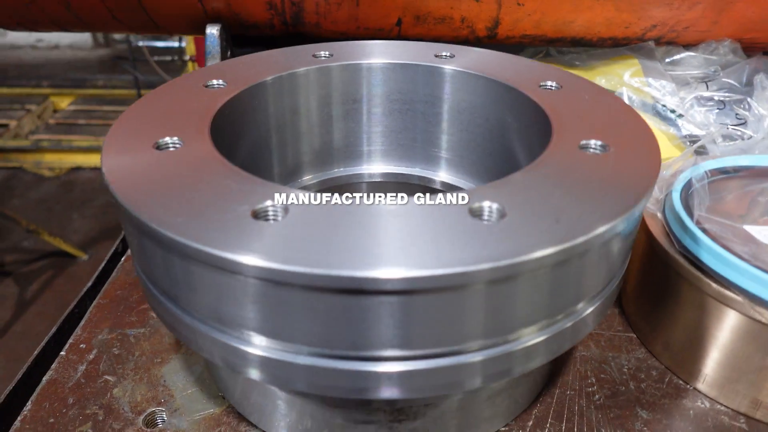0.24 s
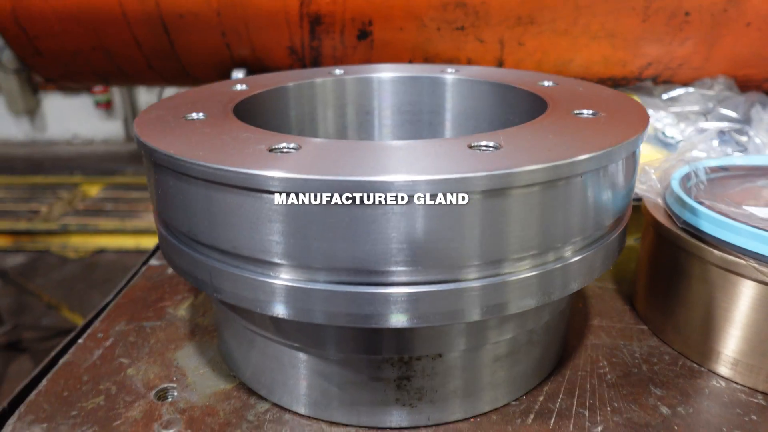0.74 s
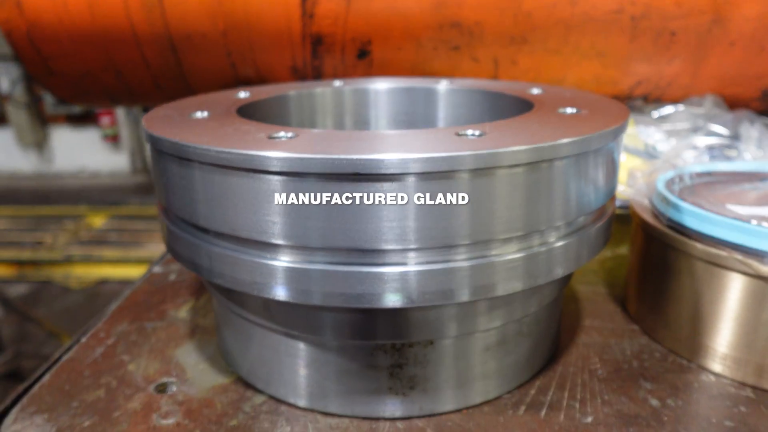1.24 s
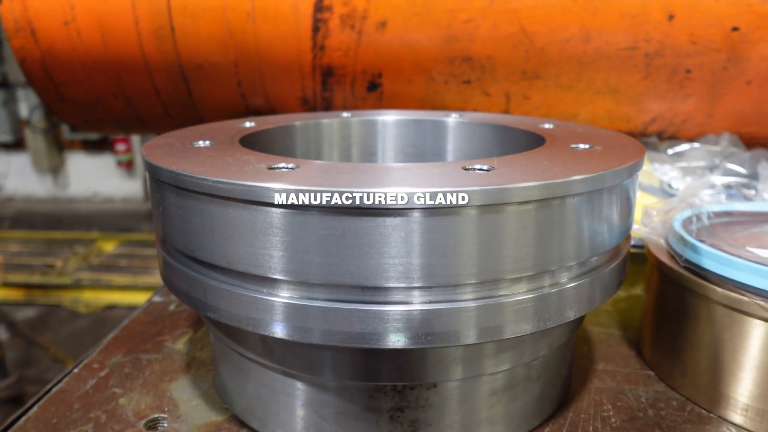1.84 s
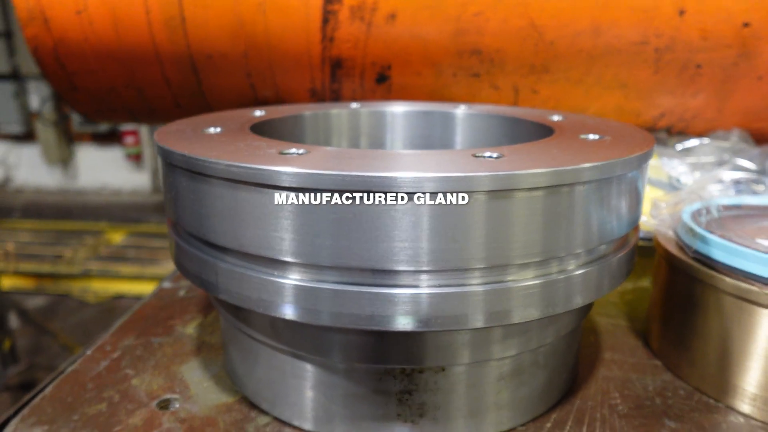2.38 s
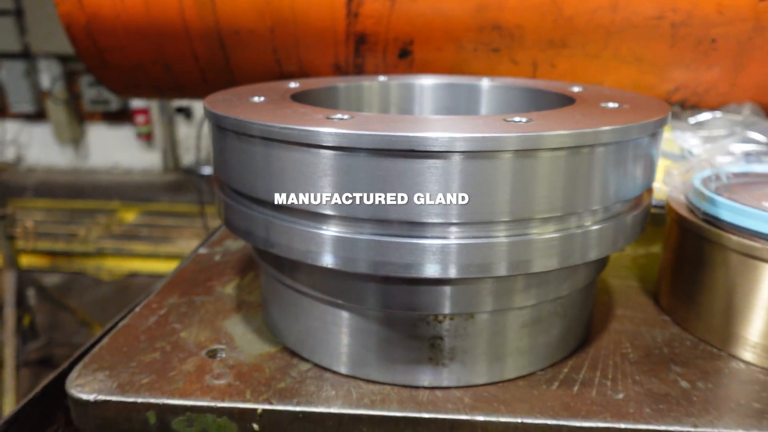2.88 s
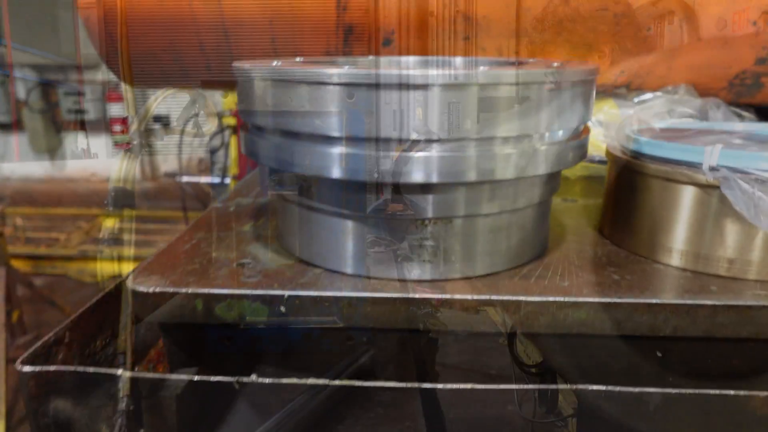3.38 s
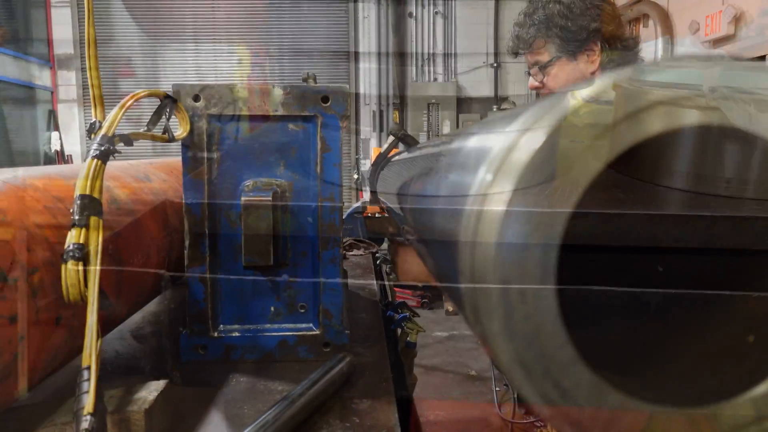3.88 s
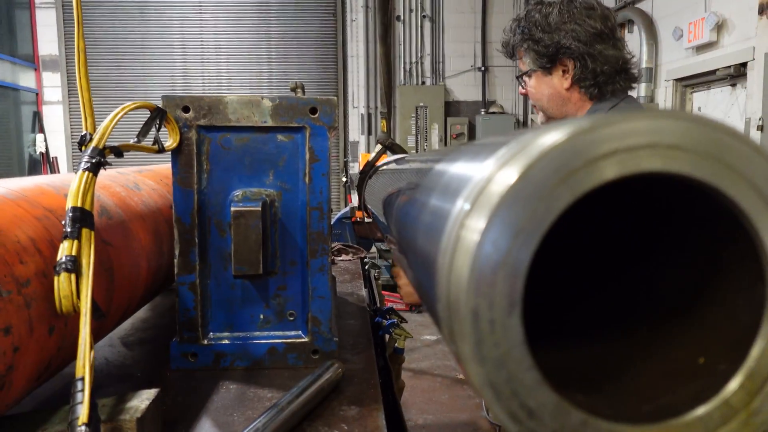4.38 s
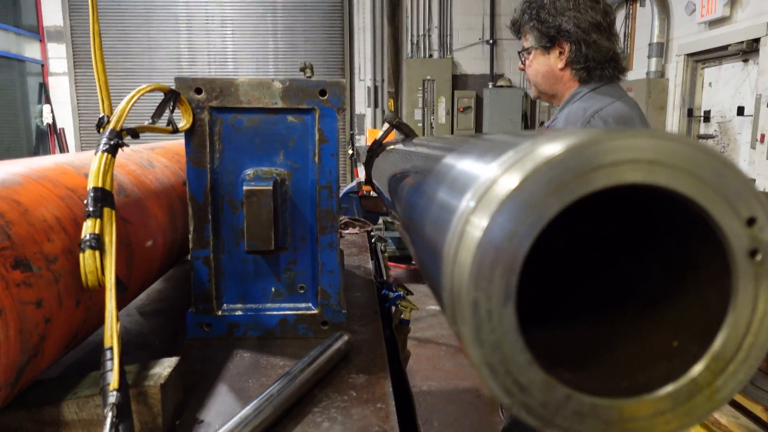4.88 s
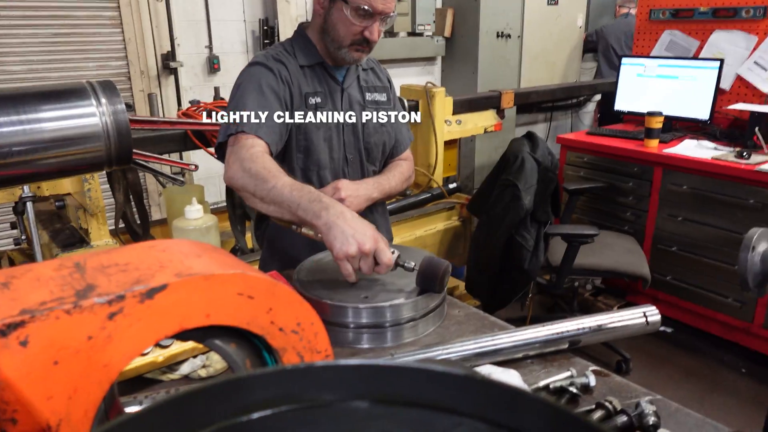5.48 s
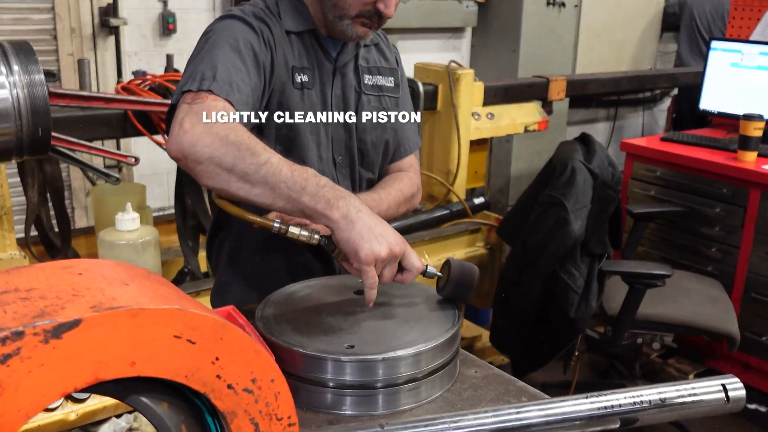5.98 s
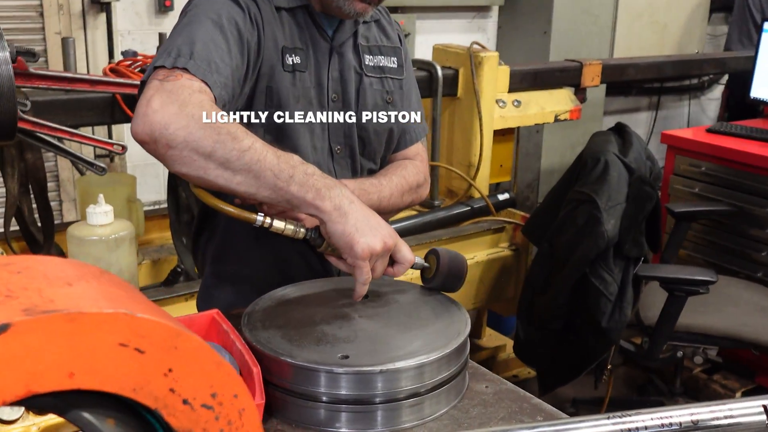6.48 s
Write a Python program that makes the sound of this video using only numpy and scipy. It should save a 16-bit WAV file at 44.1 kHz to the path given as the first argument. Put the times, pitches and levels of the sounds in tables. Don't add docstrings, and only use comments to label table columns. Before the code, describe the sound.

From the start, a machine shop roars steadily, with a pulsing low compressor throb and constant motor hum. A hand is already rubbing steel in short hissy, scraping strokes, with dull knocks almost at once and faint distant belt squeals; by about 0.5 s the strokes thin out into light ticks and rattles. At 1.04 s a hard cut brings a bright metal clang with rapid bounces and short ringing, followed by quick rubbing strokes and knocks until about 2.2 s, then sparser scrapes. Around 2.8 s it skips to a quieter patch with small taps and squeals. At 3.2 s the same clang and rubbing repeat, thinning after 4.3 s. At 5.3 s everything cuts to a close air grinder: a shrill whine near 950 Hz rises slightly, dips near 5.7 s and recovers, with abrasive rasp and exhaust hiss. After 6.1 s it sags, becoming rougher and less whiny until the end at about 6.7 s.

```python
import sys
import numpy as np
from scipy import signal
from scipy.fft import rfft, irfft, next_fast_len
from scipy.io import wavfile
from scipy.ndimage import uniform_filter1d

SR = 44100
rng = np.random.default_rng(int(sys.argv[2]) if len(sys.argv) > 2 else 0)


def wav_out(sig):
    wavfile.write(sys.argv[1], SR, np.round(np.clip(np.atleast_2d(sig).T, -1, 1) * 32767).astype(np.int16))


def gain_from_decibels(decibels):
    exponent = np.asarray(decibels, float) / 20
    return 10 ** exponent


N = 296952

SHOP_START_S, FADE_IN_S = 3.20394, 0.012


def level(x, db):
    return x * gain_from_decibels(db) / np.sqrt(np.mean(x ** 2))


def colour(x, points):
    hz, db = np.transpose(points)
    size = next_fast_len(N)
    f = np.arange(size // 2 + 1) * SR / size + 1
    gain = gain_from_decibels(np.interp(np.log(f), np.log(hz), db))
    return irfft(rfft(x, size) * gain, size)[:N]


def walk(rate):
    k = int(SR / rate)
    held = np.repeat(rng.standard_normal(N // k + 1), k)
    return 1.308 * uniform_filter1d(uniform_filter1d(held, k), k)[:N]


def tone(turns, db, wobble_db, rate):
    loudness = gain_from_decibels(db + wobble_db * walk(rate))
    return np.sqrt(2) * loudness * np.sin(2 * np.pi * (turns + rng.random()))


def grit(grain_db):
    return rng.standard_normal(N) * gain_from_decibels(grain_db * rng.exponential(size=N).clip(0, 3.5))


def ramp(s, length):
    return np.clip((np.arange(N) / SR - s) / length, 0, 1)


def fading(s, db, fall_db_s):
    rise_s = 0.0061
    return ramp(s, rise_s) * gain_from_decibels(db - fall_db_s * (np.arange(N) / SR - s).clip(0))


def compressor(turns):
    # (multiple, level [dB])
    crank_tones = [(4, -18), (5, -29), (7, -3.5), (8, -4.5), (9, -7), (10, -28), (11, -29), (12, -4),
                   (13, -11.5), (16, 3.5), (17, -4.5), (18, -2), (19, 4.5), (20, 3), (21, 6), (22, 1.5),
                   (23, -23), (26, -12), (27, -5), (28, -7), (29, 6), (30, 2.5), (31, -19), (32, -37),
                   (33, 3.5), (34, -31)]
    throb = sum(tone(k * turns, db, 0.7, 3) for k, db in crank_tones)
    return level(throb, -48)


def motor_hum():
    # (pitch [Hz], level [dB])
    motor_tones = [(600, -48), (721.4, -59), (748.3, -59.5), (1184, -57), (1303, -54), (1421, -57),
                   (1836, -55), (2336, -53.5)]
    return sum(tone(np.cumsum(hz + 0.6 * walk(6)) / SR, db, 0.7, 9) for hz, db in motor_tones)


def shop_roar(turns):
    # (pitch [Hz], level [dB])
    roar_colour = [(24, -59), (40, -35), (93, -19.5), (174, -21.5), (266, -8.5), (496, -7.5), (591, -5.5),
                   (653, -4), (1280, -2.5), (1520, -3), (3840, -10.5), (7520, -27.5), (15500, -25.5)]
    pumping_db = 0.21 * walk(11) + 0.13 * np.cos(2 * np.pi * turns)
    roar = colour(rng.standard_normal(N), roar_colour) * gain_from_decibels(pumping_db)
    return level(roar, -37.5)


def machines():
    crank_hz = 13.8
    turns = np.cumsum(crank_hz * (1 + 0.002 * walk(1.45))) / SR
    return compressor(turns) + motor_hum() + shop_roar(turns)


def rubbing():
    # (start [s], end [s], hiss level [dB], dig level [dB])
    strokes = [(3.202, 3.262, -37.5, -69), (3.282, 3.433, -41.5, -54), (3.45, 3.602, -38, -36),
               (3.606, 3.759, -36.5, -41), (3.77, 3.923, -37, -34.5), (3.937, 4.072, -37, -49),
               (4.082, 4.271, -36.5, -38), (4.275, 4.338, -38.5, -45), (4.61, 4.695, -47, -51),
               (4.99, 5.028, -50, -53), (5.14, 5.21, -55.5, -52)]
    # (time [s], level [dB], fall [dB/s], scrape share [dB], hiss share [dB])
    rattles = [
        (3.224, -31.5, 39, -9, -7.5),
        (3.5, -40.5, 5.5, -2.5, -9.5),
        (4.674, -40, 3.5, -8, -33),
        (4.7, -40, 46, -5.5, -20),
        (4.87, -48.5, 29, 1, -20),
    ]
    # (pitch [Hz], level [dB])
    hiss_colour = [(1500, -20), (3000, -14), (6000, -2), (9000, 1), (12000, 1.5), (14500, 2), (15800, 1.5)]
    scrape_colour = [(2000, -44), (4000, -5.5), (5500, -4), (7500, -7), (10000, -14), (14000, -45)]
    rattle_colour = [(700, -43), (1400, -13), (2500, -4), (3600, -6.5), (5000, -13.5), (8000, -26)]
    attack_s, stop_s, dig_s = 0.016, 0.016, 0.045
    swell_db, drag_db = 4.5, -4.5

    t = np.arange(N) / SR
    fine = fading(4.345, -39.5, 112) ** 2
    coarse, far = gain_from_decibels(2 * drag_db) * fine, 0
    for start, end, hiss_db, dig_db in strokes:
        on = ramp(start, attack_s) * (1 - ramp(end, stop_s))
        stroke = (on * gain_from_decibels(hiss_db - swell_db * (1 - ramp(start, end - start)))) ** 2
        dig = (on * gain_from_decibels(dig_db) * np.exp(-((t - end + 0.01) / dig_s) ** 2)) ** 2
        fine = fine + stroke
        coarse = coarse + gain_from_decibels(2 * drag_db) * stroke + dig
    for s, db, fall, scrape_db, hiss_db in rattles:
        spell = fading(s, db, fall) ** 2
        far = far + spell
        coarse = coarse + gain_from_decibels(2 * scrape_db) * spell
        fine = fine + gain_from_decibels(2 * hiss_db) * spell
    hiss = level(colour(grit(2.4), hiss_colour), 1.4) * np.sqrt(fine) * gain_from_decibels(0.7 * walk(40))
    scrape = level(colour(grit(1.6), scrape_colour), -2.1) * np.sqrt(coarse) * gain_from_decibels(0.71 * walk(40))
    rattle = level(colour(grit(2.2), rattle_colour), -0.68) * np.sqrt(far) * gain_from_decibels(0.7 * walk(25))
    return hiss + scrape + rattle


def cracks(blows, knock_ring):
    out = np.zeros(N)
    t = np.arange(int(SR / 2)) / SR
    for s, db, ring, hz, ratio, t60 in blows:
        ratio = max(ratio, 1.02)
        rise = np.minimum(t / 0.0017, 1)
        burst = rng.standard_normal(len(t)) * gain_from_decibels(db) * 1000 ** (-t / t60) * rise
        burst = signal.lfilter(*signal.butter(2, [hz / ratio, hz * ratio], "band", fs=SR), burst)
        softer_db = -8 * (ring > knock_ring)
        out[int(s * SR):int(s * SR) + len(t)] += burst * gain_from_decibels(softer_db)
    return out


def ringing(blows):
    ring_hz = [390, 1530, 1570, 1950, 2434, 2766, 3136, 3320, 3835, 4380, 4800, 5114, 6717, 7017, 7445,
               8519, 9450, 10410, 10500, 12750]
    ring_t60_s = [0.84, 0.84, .7, .7, .9, .7, .4, 1.44, .4, 0.96, .4, 0.76, .9, .6, .7, .7, .35, .7, .55,
                  .55]
    # (partner split [Hz], level of the whole tone [dB])
    ring_partners = [(20.2, -2.5), (14.3, 1.5), (25.6, -1), (30.3, 0.5), (29.7, -2), (45, 0.5), (32.3, -4),
                     (41.8, 3.5), (30, -9), (52, 3.5), (25, -9), (61, 2.5), (48, 0), (30, -5), (50, -4),
                     (36, -7), (30, -7), (40, -3), (50, -6), (60, -6)]
    rise_s, side_db = 0.0053, -8
    in_step_s = 3.255

    out = np.zeros(N)
    first = int(SHOP_START_S * SR)
    t = np.arange(first, first + SR) / SR
    for hz, t60, (split, db) in zip(ring_hz, ring_t60_s, ring_partners):
        feed = np.zeros(SR)
        for s, blow_db, ring, blow_hz, ratio, _ in blows:
            near = 1 / (1 + (np.log(hz / blow_hz) / np.log(max(ratio, 1.02))) ** 4)
            feed[min(int(s * SR) - first, SR - 1)] += near * (ring * gain_from_decibels(blow_db)) ** 2
        energy = signal.lfilter([1], [1, -1000 ** (-2 / (SR * t60))], feed)
        swing = np.sqrt(signal.lfilter([1], [1, -np.exp(-1 / (SR * rise_s))], energy))
        start = rng.random()
        beat = 0
        for shift, less_db in ((-0.5, side_db), (0, 0), (0.4, side_db)):
            turns = (hz + split * shift) * (t - in_step_s) + start
            beat = beat + gain_from_decibels(less_db) * np.sin(2 * np.pi * turns)
        flutter = gain_from_decibels(2 * walk(60)[:SR])
        out[first:first + SR] += gain_from_decibels(-41.5 + db) * swing / swing.max() * beat * flutter
    return out


def steel():
    # (time [s], level [dB], ring share [ratio], crack pitch [Hz], spread [ratio])
    clang = [
        (3.207, -25, 2.6, 4600, 1.14),
        (3.218, -21, 1.25, 5500, 1.66),
        (3.238, -23.5, 1.6, 6500, 2.2),
        (3.262, -30, 0.9, 5000, 2.3),
        (3.29, -30.5, 2.5, 3970, 2.46),
        (3.31, -34, 4.1, 1580, 1.11),
        (3.375, -38, 6.1, 1500, 1.09),
        (3.222, -40, 1, 390, 1.21),
        (3.33, -40.5, 1, 390, 1.21),
        (3.622, -32, 2, 3320, 1.07),
    ]
    # (time [s], level [dB], crack pitch [Hz], spread
    # [ratio], 60 dB fall [s])
    knocks = [(3.619, -20.5, 3560, 1.92, 0.18), (3.935, -26, 4200, 2.1, 0.32),
              (3.934, -21, 2800, 1.17, 0.15), (3.945, -28.5, 5600, 1.25, .35), (4, -29, 8500, 1.3, 0.27),
              (3.745, -44, 2100, 0.99, 0.052), (4.3, -29, 5800, 1.6, 0.15), (2.8, -39, 6000, 1.2, 0.071),
              (4.226, -22.5, 5350, 1.07, 0.15), (4.674, -26, 4500, 1.6, 0.038), (4.713, -29, 4600, 2, .035),
              (4.787, -31.5, 4800, 1.8, .04), (6.1, -39, 6140, 2.5, .04)]
    clang_t60_s, knock_ring = 0.069, 0.06
    blows = [(*row, clang_t60_s) for row in clang]
    blows += [(s, db, knock_ring, *rest) for s, db, *rest in knocks]
    return cracks(blows, knock_ring) + ringing(blows)


def belt():
    # (time [s], length [s], first pitch [Hz], last pitch [Hz], level [dB])
    squeals = [(3.614, 0.26, 1843, 1820, -49), (4.017, 0.05, 1160, 1175, -42),
               (4.141, 0.037, 1160, 1215, -46), (4.199, 0.067, 1169, 1207, -44.5),
               (4.304, .035, 1400, 1500, -48), (4.565, .035, 1420, 1436, -46),
               (5.083, .04, 1480, 1570, -48), (4.198, .08, 1300, 1327, -52),
               (4.234, 0.034, 1400, 1450, -48), (4.32, 0.061, 1310, 1300, -48),
               (4.467, 0.044, 1385, 1470, -50), (4.534, 0.084, 1288, 1350, -47),
               (4.63, 0.037, 1307, 1345, -45), (4.99, 0.057, 1220, 1225, -49),
               (4.343, 0.11, 1300, 1307, -55.5), (4.527, 0.042, 1420, 1460, -54),
               (4.754, 0.084, 1179, 1185, -45.5), (5.09, 0.07, 1180, 1147, -50),
               (5.18, 0.05, 1140, 1180, -45)]
    out = np.zeros(N)
    for s, length, from_hz, to_hz, db in squeals:
        u = ramp(s, length)
        swell = np.sqrt(np.sin(np.pi * u).clip(0))
        turns = np.cumsum(from_hz + (to_hz - from_hz) * u) / SR
        out += swell * tone(turns, db, 1.5, 30)
    return out


def shop():
    return machines() + rubbing() + steel() + belt()


def curves(rows):
    s, *columns = np.transpose(rows)
    return [np.interp(np.arange(N) / SR, s, c) for c in columns]


def echo(x, t60):
    t = np.arange(int(t60 * SR)) / SR
    tail = rng.standard_normal(len(t)) * 1000 ** (-t / t60)
    return signal.oaconvolve(x, tail / np.sqrt(np.sum(tail ** 2)))[:N]


def vane_whine(turns, shaft_hz, vane_db, tilt, lost):
    # (multiple, level [dB], added at full tilt [dB], added per lost speed [dB/Hz], wobble [dB])
    shaft_tones = [(.5, -106, 10.5, 0, 2), (1, -72.5, -9.5, -0.43, -0.5), (2, -71, 1.5, -0.45, 1.5),
                   (3, -65.5, -7, 0.26, 2), (5, -50, -1, -0.07, 3), (6, -58, -3, 0, 0), (7, -61.5, 8, 0, 2),
                   (8, -51.5, 3, 0.25, 2.5), (9, -52, 1, 0.19, 3.5), (10, -61.5, 8, 0.5, 3),
                   (12, -52.5, 8, 0, 3), (13, -53, 0, 0, 3), (16, -49, 2, 0, 3), (19, -57, 5, 0, 2),
                   (20, -50.5, 7, 0.04, 2.5)]
    whine = tone(4 * turns, vane_db, 1.2, 20)
    for k, db, a, b, wobble_db in shaft_tones:
        cup_db = 7.5 / (1 + ((k * shaft_hz - 4600) / 43) ** 4)
        whine = whine + tone(k * turns, db + a * tilt + b * lost + tilt * cup_db, wobble_db, 25)
    return whine


def bites(turns):
    count = N // 100
    limp_db = 1.5 * (-1) ** np.arange(count)
    force = gain_from_decibels(1.3 * rng.standard_normal(count).clip(-2, 1) + limp_db)[turns.astype(int)]
    grain_turns = 0.22
    fresh = (0.29 + force * np.exp(-(turns % 1) / grain_turns)) * rng.standard_normal(N)
    alike = echo(np.diff(np.floor(turns), prepend=0) * force, 0.003)
    return level(alike, -15) + level(fresh, 0)


def wheel_rasp(turns, high_db, low_db, drone_db):
    # (pitch [Hz], level [dB])
    high_colour = [(300, -90), (2800, -22), (3500, -4), (3850, -0.5), (4150, -5.5), (4500, -16),
                   (5500, -36), (9000, -48)]
    low_colour = [(300, -85), (2200, -38), (2800, -12), (3300, -1), (3600, 1), (4000, -24), (6000, -52)]
    drone_colour = [(300, -90), (900, -50), (1400, -15), (1700, 2.5), (2000, 2.5), (2350, 0.5), (2700, -10),
                    (3300, -15), (6000, -50)]
    high = level(colour(bites(turns), high_colour), -0.61) * gain_from_decibels(high_db + 0.96 * walk(9.9))
    low = level(colour(bites(turns), low_colour), -2.3) * gain_from_decibels(low_db + 0.5 * walk(11))
    drone = level(colour(bites(turns), drone_colour), -1.4) * gain_from_decibels(drone_db + 0.5 * walk(30))
    return high + low + drone


def exhaust_hiss(exhaust_db):
    # (pitch [Hz], level [dB])
    exhaust_colour = [(40, -75), (180, -65), (400, -27.5), (700, -16), (1500, -2.5), (4500, -0.5),
                      (6000, -0.5), (7000, -2.5), (8200, -3), (9000, -8), (11000, -6.5), (12200, -7.5),
                      (13200, -11.5), (15500, -11)]
    return level(colour(grit(1.1), exhaust_colour), 2.5) * gain_from_decibels(exhaust_db + 0.6 * walk(70))


def wheel_hops(turns):
    # (multiple of shaft speed, time [s], length [s], level [dB])
    hops = [(6.5, 6.05, .15, -49.5), (7, 6.1, .15, -50), (5.5, 6.25, .15, -56), (7.5, 6.33, .17, -46),
            (9.5, 6.3, .15, -53), (16.5, 5.95, .15, -46), (8, 5.7, .06, -44), (8, 6.65, 0.2, -41),
            (9, 6.68, .1, -47), (10, 6.63, .12, -46), (16, 6.63, .12, -41.5), (17, 6.4, .15, -46),
            (3, 6.47, .2, -68)]
    t = np.arange(N) / SR
    return sum(tone(k * turns, db, 2.5, 30) * np.exp(-((t - s) / length) ** 2)
               for k, s, length, db in hops)


def bench_room(tilt):
    # (pitch [Hz], level [dB])
    room_colour = [(18, -72), (30, -45), (165, -29), (219, -17), (274, -24), (543, -9), (599, -4.5),
                   (850, -4), (1100, -27), (1870, -120)]
    return level(colour(rng.standard_normal(N), room_colour), -60.5) * gain_from_decibels(-7 * tilt)


def grinder():
    # (time [s], shaft speed [Hz], vane tone level [dB], wheel tilt [0-1], air flow level [dB])
    run = [(5.31, 224.6, -48, 0, 1), (5.362, 233.6, -43, 0, 1.5), (5.375, 235.7, -42, 0, -1.5),
           (5.42, 239.8, -41.5, 0.06, 1.5), (5.49, 241.5, -42, 0.23, -1.5), (5.6, 238.5, -45, 0, 0),
           (5.67, 233.0, -44.5, 0, -0.5), (5.76, 236.6, -41, 0.1, 1), (5.81, 238.3, -44, 0.08, 0.5),
           (5.92, 239.7, -42.5, 0.14, 1.5), (6.064, 239.9, -38.5, 0.68, 0.5),
           (6.134, 238.4, -39.5, 0.86, 1), (6.252, 229.9, -43.5, 0.87, 0.5), (6.47, 230.1, -47.5, 0.9, 1),
           (6.62, 225.4, -52.5, 0.99, 0), (6.73, 223.2, -53, 1.05, 0.5)]
    # (level [dB], added at full tilt [dB], per lost speed [dB/Hz])
    rasp_levels = [(-32.5, -7, -0.19), (-37, -4, 0.36), (-44, 3.5, 0.3), (-38.5, 2.5, 0.0249)]
    free_hz = 240
    shaft_hz, vane_db, tilt, air_db = curves(run)
    lost = free_hz - shaft_hz
    high_db, low_db, drone_db, exhaust_db = (db + a * tilt + b * lost for db, a, b in rasp_levels)
    turns = np.cumsum(shaft_hz * (1 + 0.0006 * walk(40))) / SR
    whine = vane_whine(turns, shaft_hz, vane_db, tilt, lost)
    rasp = wheel_rasp(turns, high_db, low_db, drone_db)
    rasp = rasp + exhaust_hiss(exhaust_db + air_db) + wheel_hops(turns)
    return whine + rasp + gain_from_decibels(-13.0) * echo(rasp, 0.36) + bench_room(tilt)


def spread(source, side_points):
    mid, side = source(), colour(source(), side_points)
    return np.array([mid + side, mid - side])


def scene():
    # (time [s], shop time that plays from there [s])
    splices = [
        (0, 3.90388),
        (1.0351, 3.20394),
        (2.7700, 4.50503),
        (3.20394, 3.20394),
    ]
    # (pitch [Hz], side minus mid [dB])
    shop_width = [(60, -32), (110, -35), (200, -23), (380, -15.5), (700, -13.5), (1290, -9.5), (2380, -8),
                  (4400, -7.5), (8120, -10), (15000, -14.5)]
    grinder_width = [(60, -19), (110, -17), (200, -33), (380, -25), (700, -20), (1290, -21), (2380, -14.5),
                     (4400, -15), (8120, -12), (15000, -15)]
    change_s = 5.3055
    t = np.arange(N) / SR
    loop = spread(shop, shop_width) * np.clip((t - SHOP_START_S) / FADE_IN_S, 0.1, 1)
    starts, sources = np.transpose(splices)
    piece = np.searchsorted(starts, t, side="right") - 1
    jump = np.round((sources - starts)[piece] * SR).astype(int)
    looped = loop[:, np.minimum(np.arange(N) + jump, N - 1)]
    grinding = spread(grinder, grinder_width) * (0.5 + 0.5 * ramp(change_s, FADE_IN_S))
    return np.where(t < change_s, looped, grinding)


def top_cut(x):
    return signal.sosfilt(signal.butter(12, 15880, fs=SR, output="sos"), x)


def record(dry):
    # (pitch [Hz], left minus right [dB])
    lean = [(60, -1), (110, 0.0), (200, 1.5), (380, -1), (700, -0.5), (1290, -0.5), (2380, -0.5),
            (4400, -1.5), (8120, 0.0), (15000, 1)]
    half = np.array(lean) * [1, 0.5]
    pair = np.array([colour(dry[0], half), colour(dry[1], half * [1, -1])])
    top_hz = 15860
    pair = signal.sosfilt(signal.ellip(10, 0.2, 58, top_hz, fs=SR, output="sos"), pair)
    return top_cut(pair)


dry = scene()
out = record(dry)
wav_out(out)
```